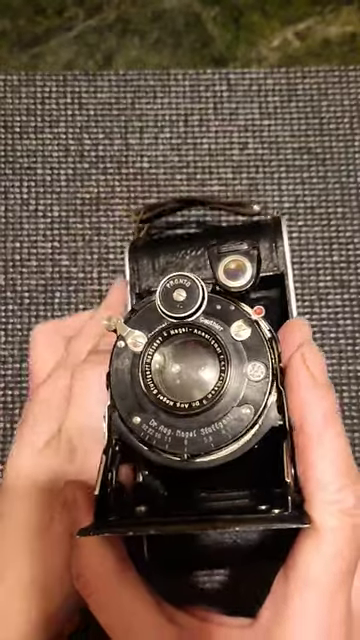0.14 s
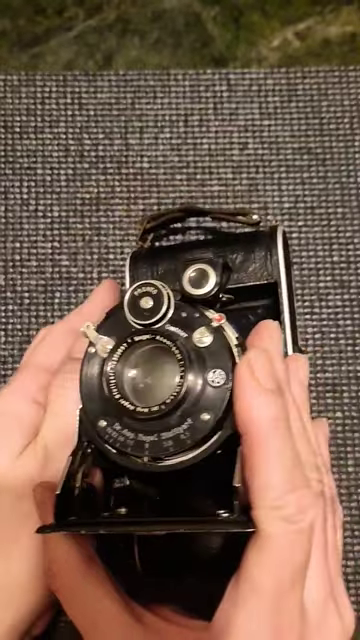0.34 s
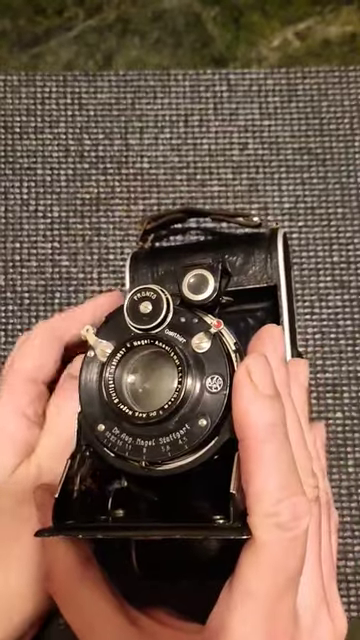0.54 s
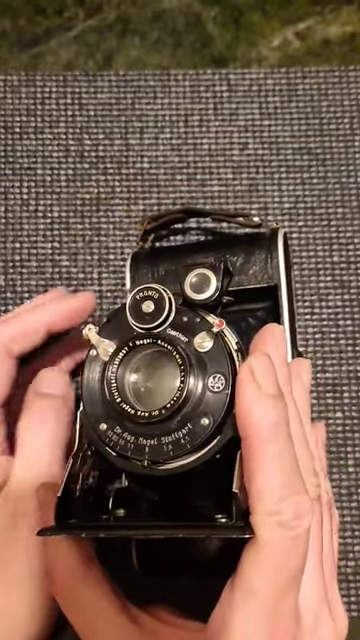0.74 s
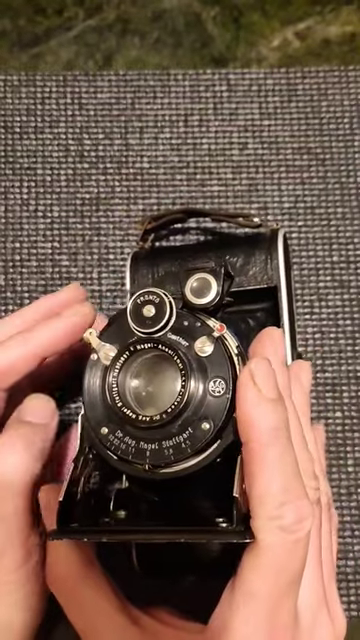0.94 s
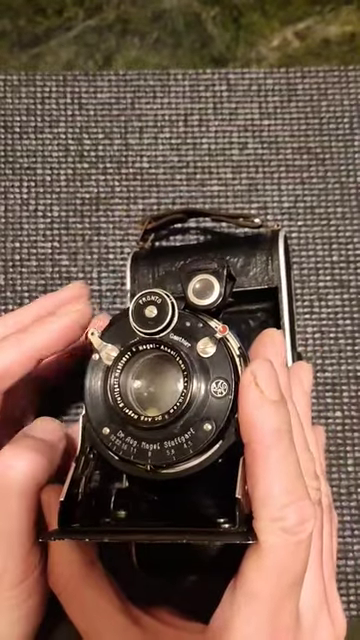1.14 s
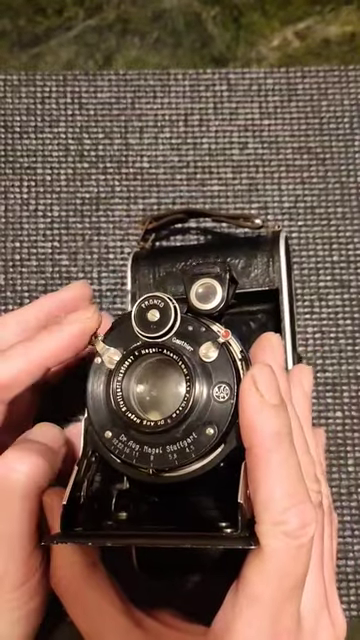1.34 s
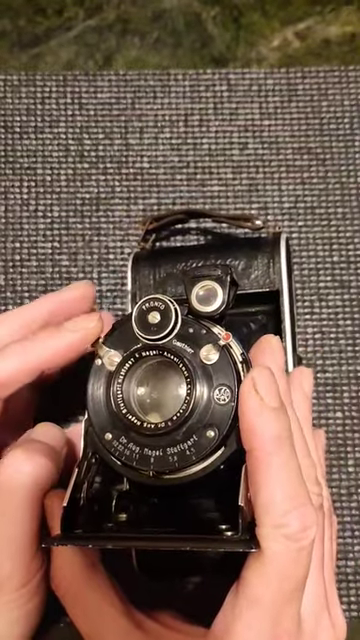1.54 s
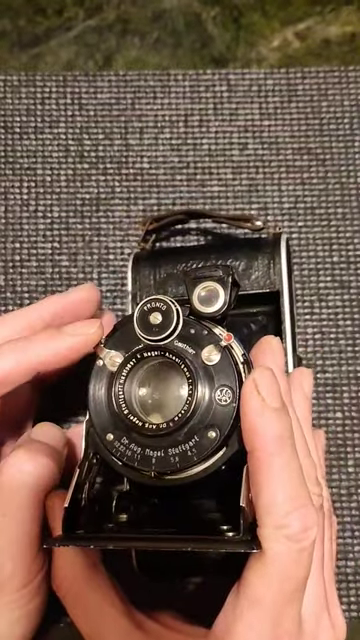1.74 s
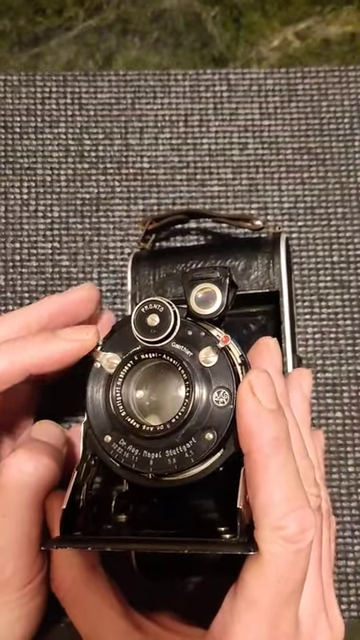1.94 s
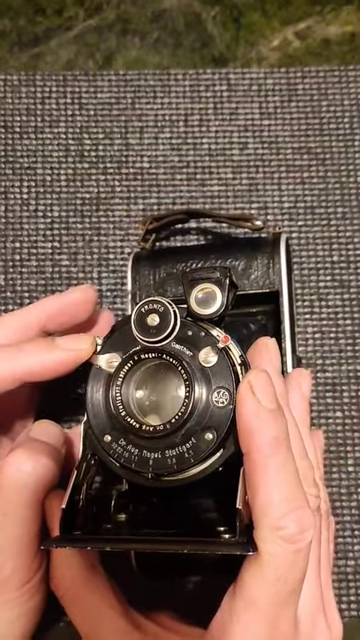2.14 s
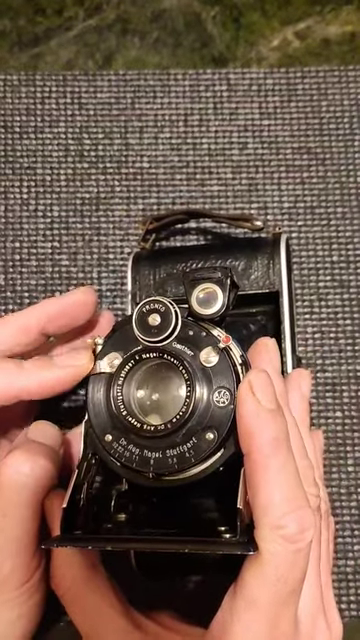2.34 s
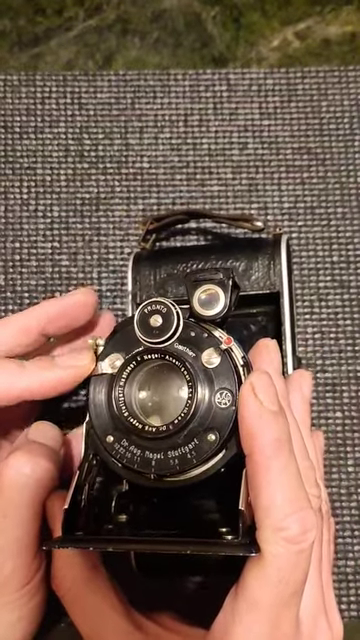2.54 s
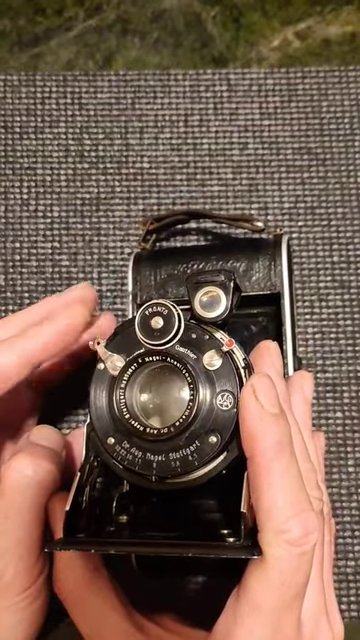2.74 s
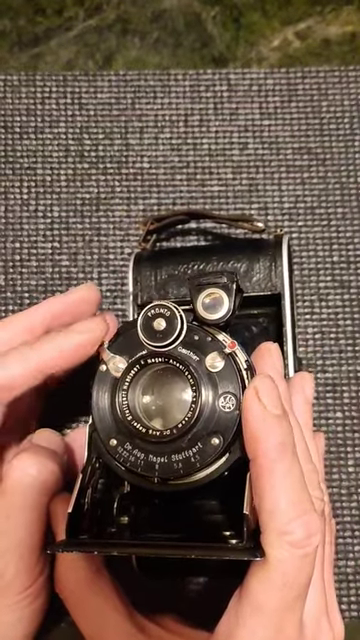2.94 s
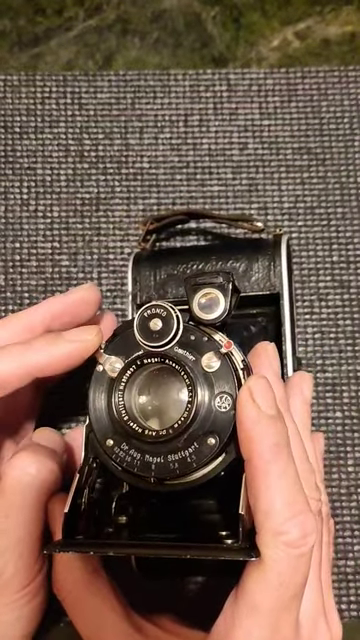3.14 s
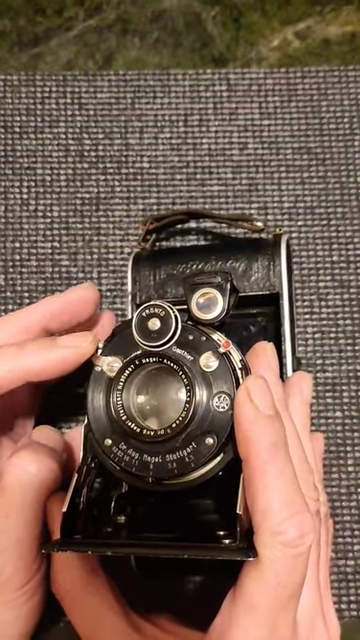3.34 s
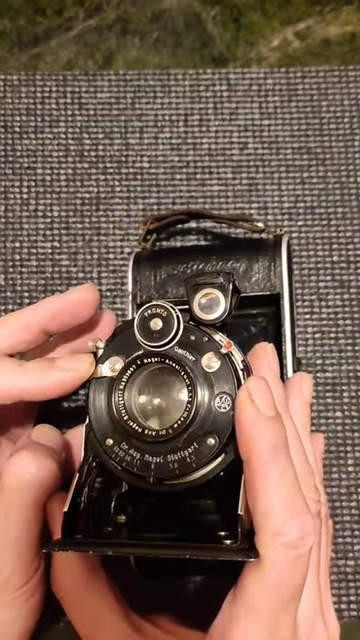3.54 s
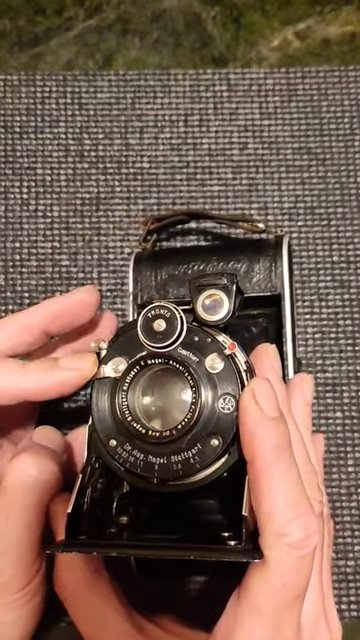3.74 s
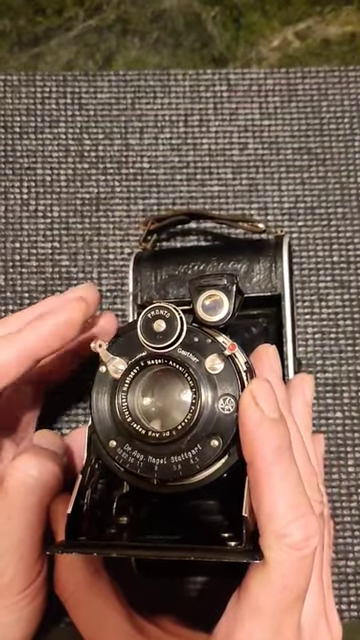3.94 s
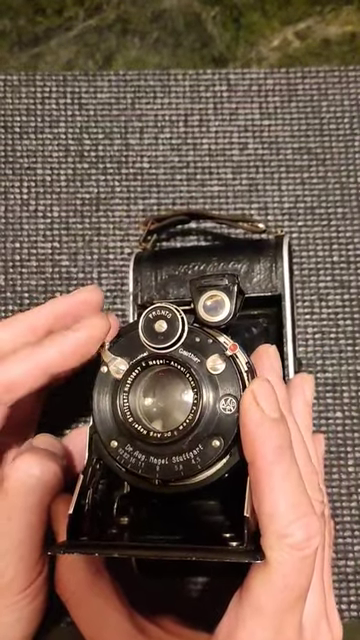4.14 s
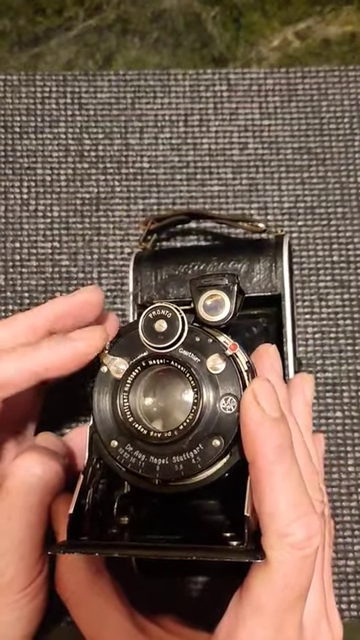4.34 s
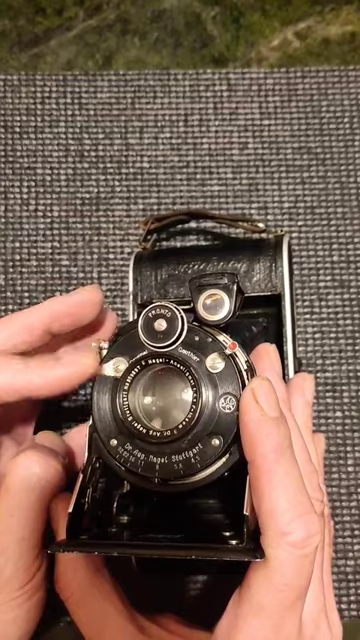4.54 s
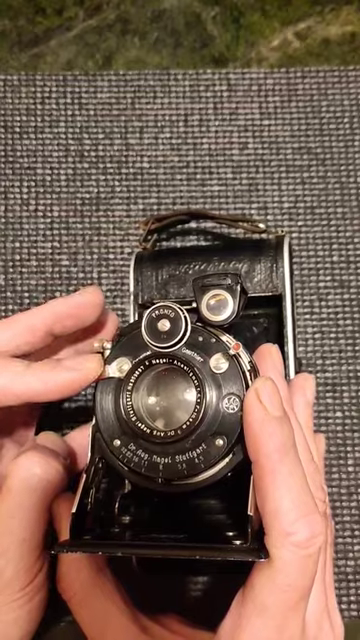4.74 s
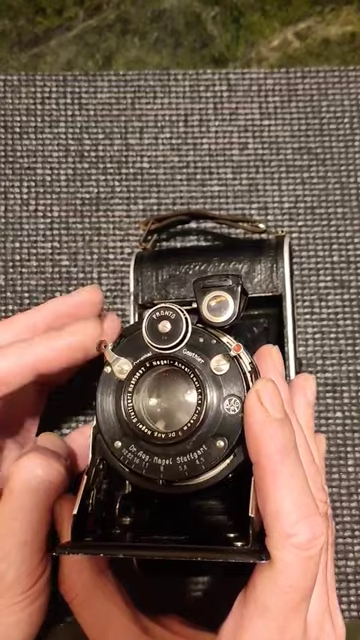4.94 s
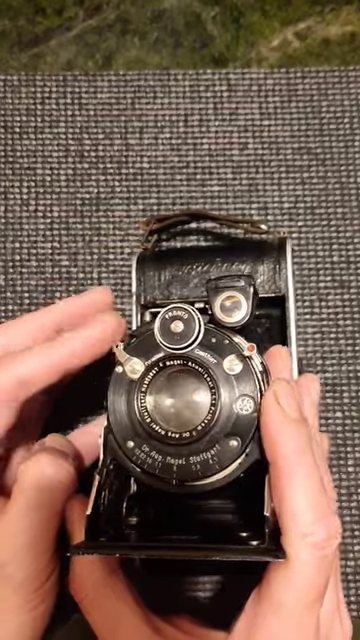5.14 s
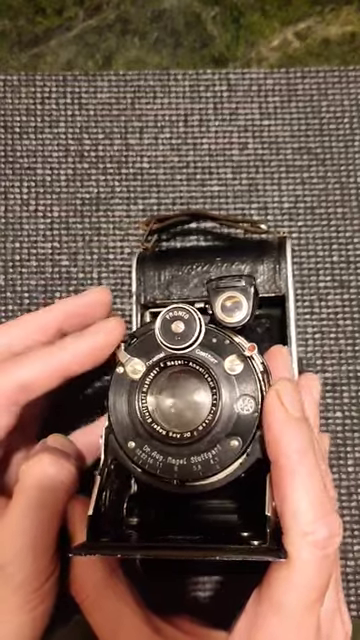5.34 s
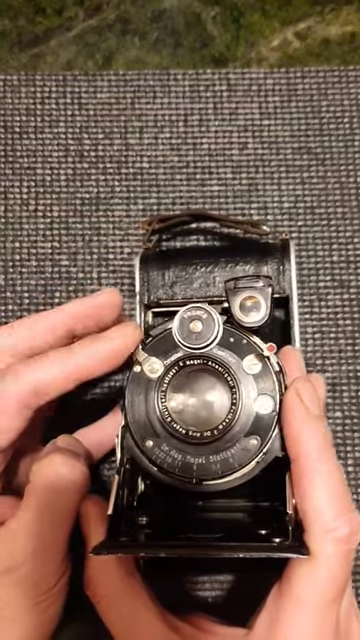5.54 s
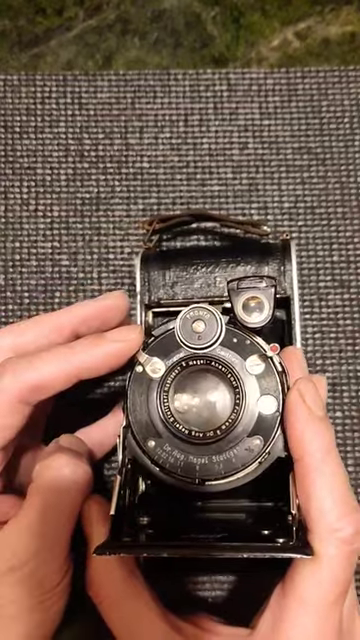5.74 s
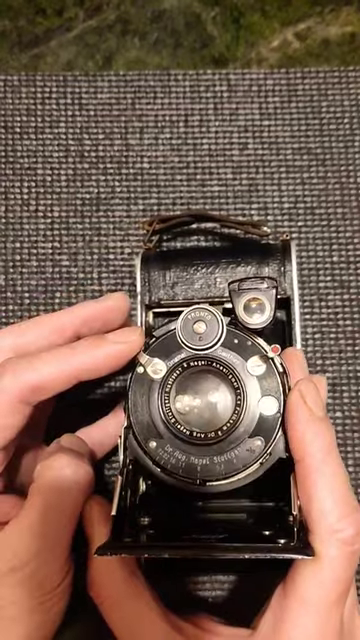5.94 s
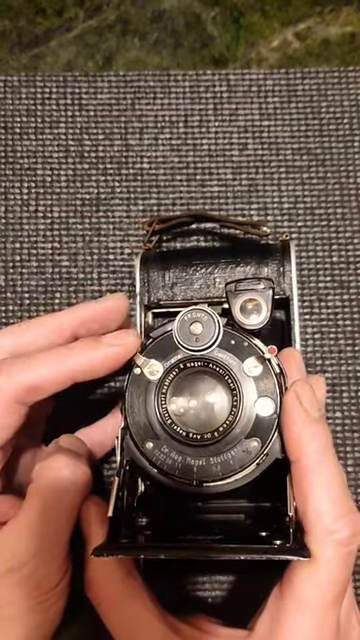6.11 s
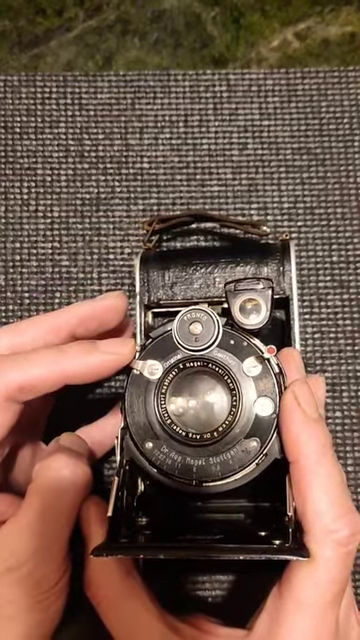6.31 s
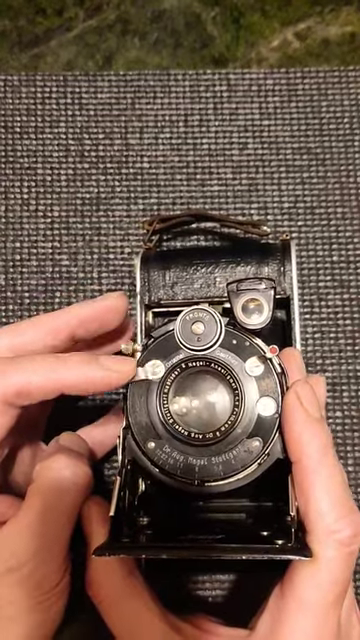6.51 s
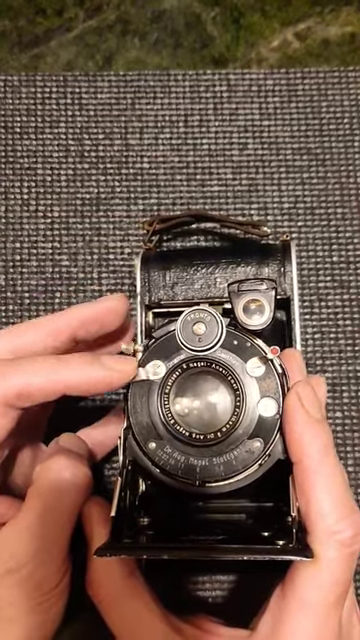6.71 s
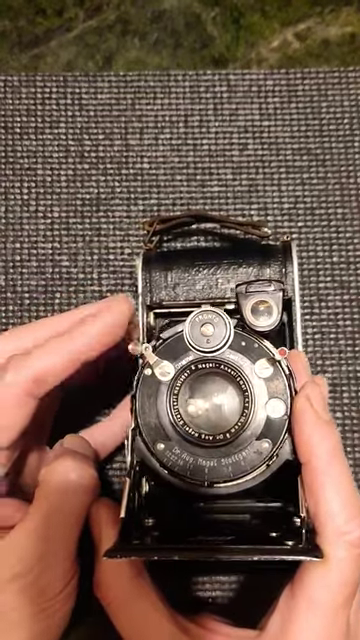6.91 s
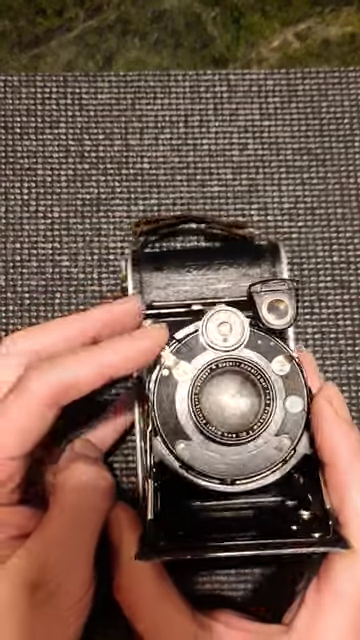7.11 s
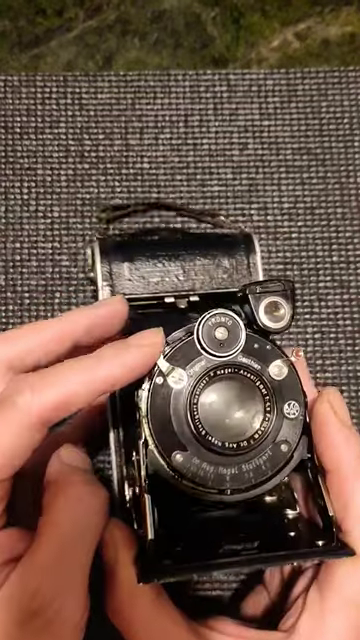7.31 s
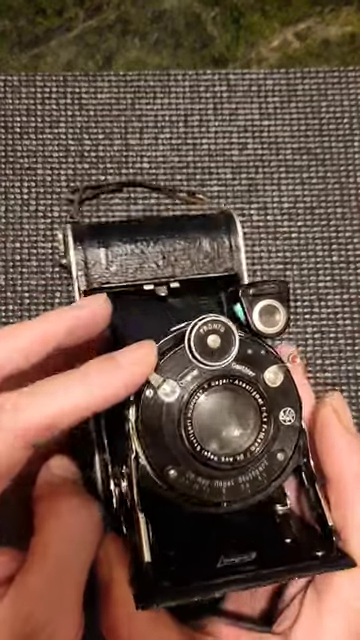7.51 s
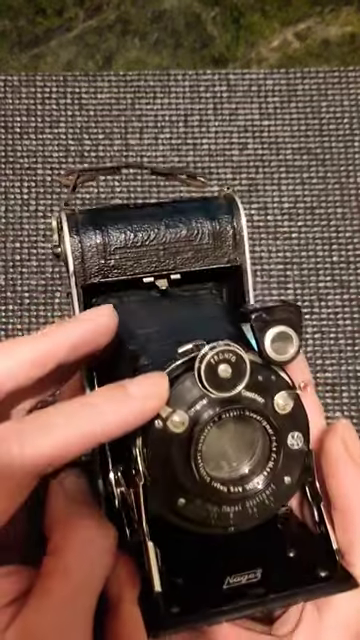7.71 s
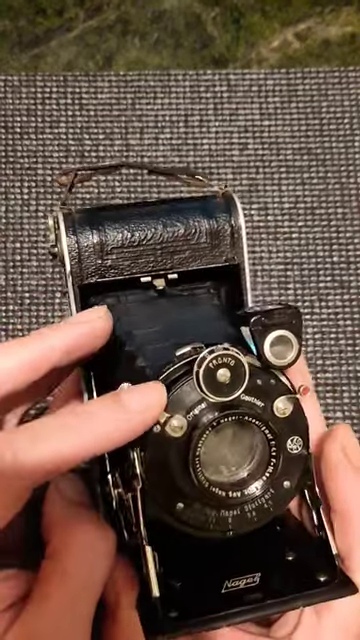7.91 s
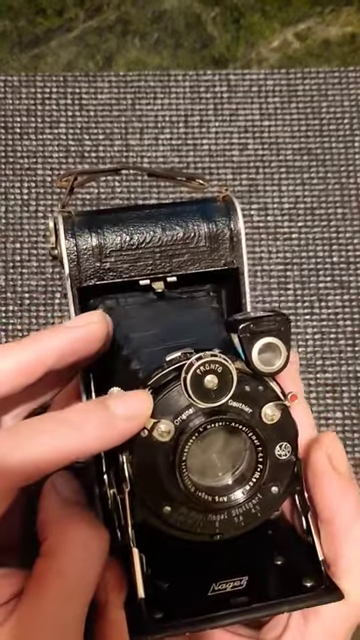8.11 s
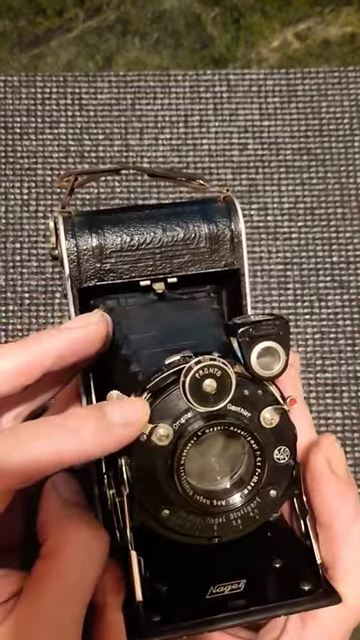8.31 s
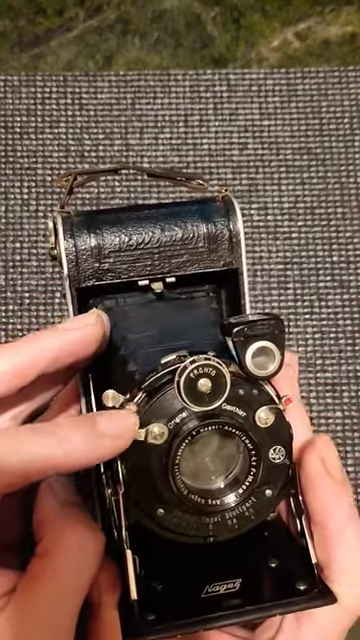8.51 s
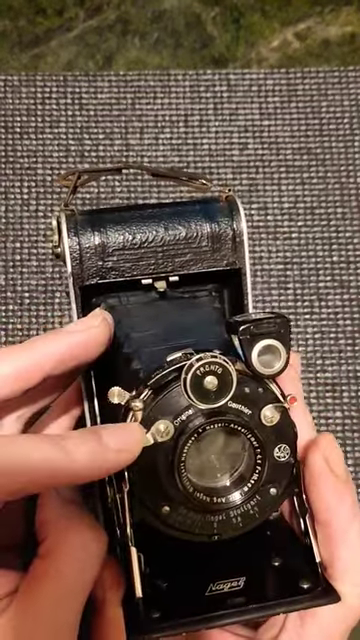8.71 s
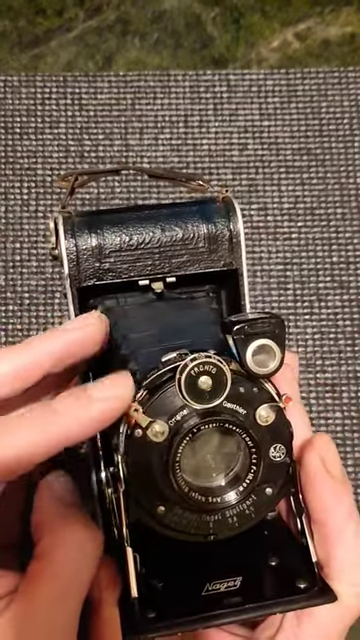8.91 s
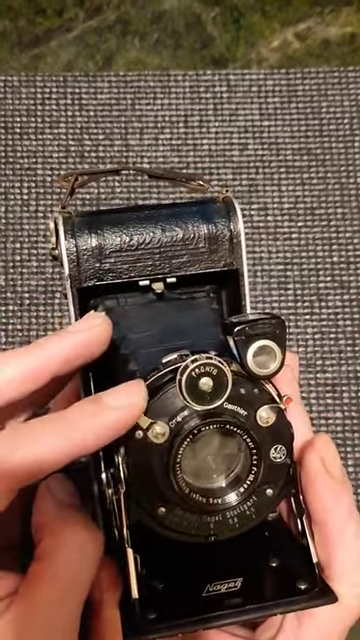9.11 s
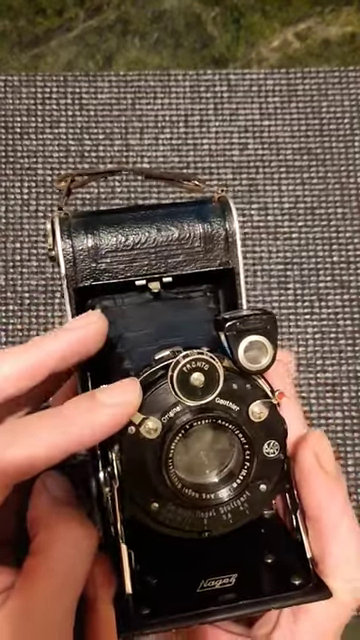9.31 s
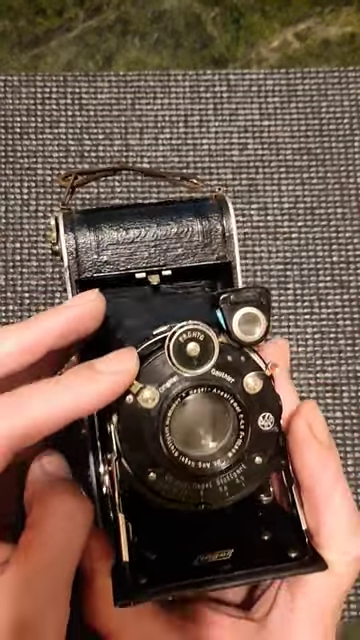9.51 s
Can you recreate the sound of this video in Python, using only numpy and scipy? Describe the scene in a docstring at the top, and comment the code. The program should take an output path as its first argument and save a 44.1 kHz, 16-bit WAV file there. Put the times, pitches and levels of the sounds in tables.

```python
"""Hands rustle and knock softly on the leather body of an old folding camera, close to a stereo microphone.
Five times a finger presses the lever: the shutter trips, slams and rebounds within 25 ms, and the lever clicks
back about 0.3 s later. Each blow is a rattle of tiny impacts that sets the camera's parts ringing in their
damped modes; the rustle is friction noise, and a finger rubbing on the lever makes faint narrow swishes. Behind
it lies a quiet room with soft puffs of noise, mains hum, the rumble of far traffic and a faint hiss."""
import sys
import numpy as np
from scipy import signal
from scipy.fft import rfft, irfft
from scipy.io import wavfile
from scipy.ndimage import uniform_filter1d

SR = 44100
rng = np.random.default_rng(int(sys.argv[2]) if len(sys.argv) > 2 else 0)


def master(y):
    """Save y as 16-bit WAV."""
    cut = np.clip(np.atleast_2d(y).T, -1, 1)
    pcm = np.round(cut * 32767)  # scale
    wavfile.write(sys.argv[1], SR, pcm.astype(np.int16))


N = 421596

# Each kind of stroke: drive of crack, housing, blades, lever, frame and body in dB, then rattle in ms.
TRIP = (0.75, -3, -0.7, -21.5, -7, -12.5, 6)
CATCH = (-4, -0.3, -13, -21, -6, -12, 6)
BLADES = (3.5, -3.5, -3, -24, -12.5, -16.5, 4.5)
SLAM = (-4.5, 3, -9.5, -25, -4.5, -18.5, 4.5)
REBOUND = (-5.5, 3, -12, -24, -14.5, -16.5, 3.5)
RETURN = (0.3, -3.5, -2, -5.5, -9.5, -12.5, 6)
TICK = (0, -2, -7.5, -13, -6.5, -29, 7)
# The shutter fires. Each row: start in seconds, gains of trip, blades and slam in dB,
# rebound delay in ms, rebound gain in dB.
FIRINGS = [(2.4771, -25, -18.5, -14.5, 22, -23.5), (3.684, -27, -17, -17, 22.7, -22.5),
           (4.7037, -27, -15.5, -15.5, 25, -24), (6.625, -24.5, -17.5, -16, 22.6, -18.5),
           (8.7125, -27.5, -13, -18.5, 21, -26)]
def shutter(catch_ms=2.2, blades_ms=11.6, slam_ms=14, settle_ms=10, catch_db=1, settle_db=-16):
    """A chain of collisions: trip, catch, blades, slam, rebound and a weaker settling bounce."""
    strokes = []
    for start, trip_db, blades_db, slam_db, rebound_ms, rebound_db in FIRINGS:
        chain = [(0, trip_db, TRIP), (catch_ms, trip_db + catch_db, CATCH),
                 (blades_ms, blades_db, BLADES), (slam_ms, slam_db, SLAM),
                 (rebound_ms, rebound_db, REBOUND),
                 (rebound_ms + settle_ms, rebound_db + settle_db, REBOUND)]
        strokes += [(start + ms / 1000, db, *kind) for ms, db, kind in chain]
    return strokes


# The lever's return clicks and faint ticks. Each row: start in seconds, gain in dB.
LEVER_RETURNS = [(2.7954, -30.5), (3.9644, -24), (5.0724, -25.5), (6.9536, -27), (8.9889, -25.5)]
LEVER_TICKS = [(2.344, -58.5), (2.727, -59), (2.746, -52), (2.781, -56), (3.235, -62), (3.6435, -55.5),
               (3.9384, -54), (4.669, -61.5), (5.046, -49), (6.588, -57.5), (6.915, -52.5), (8.522, -57),
               (8.676, -59), (8.954, -52)]
def lever():
    """Impact and backlash: the lever snaps back, and ticks as it takes up or loses its slack."""
    return [(*row, *RETURN) for row in LEVER_RETURNS] + [(*row, *TICK) for row in LEVER_TICKS]


# A soft finger's drive of crack, housing, blades and lever, in dB.
FINGER_DRIVE = (3.2, -5, -12, -31)
# Fingers bump the camera. Each row: start in seconds, gain in dB, drive of frame, body and thump in dB,
# rattle in ms, low-pass cutoff in Hz.
SCUFFS = [(0.3139, -32, -2.5, -2.5, -25, 5.1, 6000), (0.321, -48, -5, -15, -27, 50, 6000),
          (0.4027, -52.5, -7, 5.5, -5, 10, 1500), (1.0557, -39, -0.5, 3, 2, 6, 6950),
          (7.186, -40, -1.5, -24, -25, 22, 4000), (7.2677, -53.5, 16.5, 6, -9, 15.6, 4140),
          (7.3127, -62.5, -6.5, 12.5, -8, 6.3, 2000), (7.389, -52, 1.5, 8, 5, 9, 5000),
          (7.6178, -52, 0, 8.5, 4.5, 8.6, 5000), (7.7699, -47, -2, 3.5, -2, 7.2, 6000),
          (7.8021, -53.5, -4, -7, -20, 8.9, 6000)]
def scuffs():
    """Soft contact passes little treble, so a finger's blows are dull."""
    return [(start, db, *FINGER_DRIVE, *rest) for start, db, *rest in SCUFFS]


# Spectra of the unringing crack and the thin blades. Each row: frequency in Hz, relative level in dB.
CRACK_SPECTRUM = [(500, -60.5), (2000, -24), (4000, -8.5), (6000, 2), (8000, -3.5), (10000, -19.5),
                  (15000, -46.5)]
BLADE_SPECTRUM = [(5000, -83.5), (7500, 16.5), (10000, 26.5), (13500, 29.5), (14500, 25), (15100, -30),
                  (16300, -40.5)]
# Modes of the shutter housing, lever, folding frame, leather-covered body with bellows, and the whole
# camera thumping in the palm. Each row: frequency in Hz, bandwidth in Hz, relative level in dB.
HOUSING_MODES = [(4530, 50, -17), (4867, 280, 7), (5500, 240, -9), (6450, 560, -8.5), (7090, 420, -9),
                 (7790, 970, -17)]
LEVER_MODES = [(1004, 350, -3.5), (1970, 120, 1.5), (2780, 56, -9.5), (3170, 150, -4), (3420, 41, -2),
               (4810, 230, -4.5), (5620, 210, -8.5), (6370, 200, -6.5), (7350, 130, -9.5), (7856, 170, -6)]
FRAME_MODES = [(1870, 47, -1.5), (1973, 93, 1), (2710, 290, -7.5), (3034, 290, -3.5), (3330, 160, -6),
               (3740, 120, -12.5)]
BODY_MODES = [(414, 38, -4), (502, 120, -6.5), (860, 52, 1), (970, 150, 5), (1556, 590, 0.5)]
THUMP_MODES = [(259.9, 140, -3), (413, 100, 0.1), (620, 210, -3)]
def camera(strokes, bumps, alike=0.59, grain_db=5.5):
    """Impact excitation: each blow is a short rattle that drives all the camera's resonances at once."""
    t, out = np.arange(2000) / SR, np.zeros((2, N + 8192))
    responses = [minimum_phase(CRACK_SPECTRUM), ringing(HOUSING_MODES, alike=0.8),
                 minimum_phase(BLADE_SPECTRUM), ringing(LEVER_MODES, alike=0.62),
                 ringing(FRAME_MODES, alike=0.7), ringing(BODY_MODES), ringing(THUMP_MODES)]
    response_db = np.array([5, 9, 12, 12, 12, 12, 12])
    # metal strokes are bright, with almost no thump (-60 dB)
    metal = [(*row, -60, rattle_ms, BAND_LIMIT_HZ) for *row, rattle_ms in strokes]
    for start, db, *drive_db, rattle_ms, cutoff_hz in metal + bumps:
        common, left, right, size = rng.standard_normal((4, len(t)))
        age = t * 4000 / rattle_ms  # the envelope peaks a quarter of the way into the rattle
        strength = gain_of(grain_db * size) * age * np.exp(-age)
        # parts radiate differently towards each ear, so the two sides agree only in part
        impacts = strength * (alike * np.sign(common) + np.sqrt(1 - alike ** 2) * np.sign([left, right]))
        softness = signal.butter(2, cutoff_hz, fs=SR, output="sos")
        at = round(start * SR)
        for response, part_db in zip(responses, response_db + drive_db):
            part = signal.sosfilt(softness, strike(impacts, response))
            part *= np.sqrt(rattle_ms)  # a longer rattle carries more energy
            out[:, at:at + part.shape[1]] += gain_of(db + part_db) * part
    return out[:, :N]


def ringing(modes, alike=1.0, size=2048):
    """Damped modes: each is a dying sine, whose phase differs between the ears when alike is below 1."""
    t = np.arange(size) / SR
    hz, width, db = np.transpose(modes)[:, :, None]
    phase = (1 - alike) * rng.uniform(-np.pi, np.pi, hz.shape) * np.array([-.5, .5])[:, None, None]
    rings = gain_of(db) * width * np.exp(-np.pi * width * t) * np.sin(2 * np.pi * hz * t + phase)
    # little is radiated below the lowest mode
    return signal.sosfilt(signal.butter(4, 0.85 * hz.min(), "high", fs=SR, output="sos"), rings)


def minimum_phase(spectrum, size=2048):
    """Minimum phase gives a spectrum its most abrupt causal response, here of unit energy."""
    log_gain = np.log(gain_of(read(spectrum, abs(np.fft.fftfreq(size, 1 / SR)))))
    taps = np.fft.ifft(np.exp(np.conj(signal.hilbert(log_gain)))).real[:size // 2]
    return (taps / np.linalg.norm(taps))[None, None]


def strike(impacts, rings, spot_db=3.5):
    """Modal superposition at unit energy; each mode's share varies, as no two blows hit the same spot."""
    modes = signal.fftconvolve(impacts[:, None], rings, axes=2)
    modes *= np.linalg.norm(rings, axis=2, keepdims=True) / np.linalg.norm(modes, axis=2, keepdims=True)
    modes *= gain_of(spot_db * rng.standard_normal((modes.shape[1], 1)))
    total = modes.sum(1)
    return total / np.linalg.norm(total, axis=1, keepdims=True)


# How the camera faces the microphone. Each row: frequency in Hz, left minus right level in dB.
FACING = [(400, -1), (800, 2), (2400, -1), (4500, -4), (8000, 0), (13000, -4.5)]
def stereo_ports(sound, lag_s=.00004):
    """Level and time differences give direction: the left port is a little further from the camera."""
    hz = np.fft.rfftfreq(N, 1 / SR)
    left = gain_of(read(FACING, hz) / 2) * np.exp(-1j * np.pi * hz * lag_s)
    return irfft(rfft(sound) * [left, 1 / left], N)


# The room's decay. Each row: frequency in Hz, time to fall by 60 dB in seconds.
ROOM_DECAY = [(300, 0.43), (800, 0.25), (2000, 0.22), (5500, 0.31), (12000, 0.27)]
# The colour of its tail. Each row: frequency in Hz, relative level in dB.
ROOM_SPECTRUM = [(300, -22), (1000, -28), (3000, -26), (4900, -33.5), (6500, -30), (13500, -30),
                 (14800, -53.5)]
def room(sound, first_s=0.0041, spacing=20):
    """Reverberation: sparse reflections of random sign, each band dying at its own rate."""
    reflections = np.zeros((2, SR // 2))
    slots = np.arange(round(first_s * SR), SR // 2 - spacing, spacing)
    arrivals = slots + rng.integers(0, spacing, (2, len(slots)))
    np.put_along_axis(reflections, arrivals, rng.choice([-1., 1.], arrivals.shape), 1)
    hz, t, bands = signal.stft(reflections, SR, nperseg=128)
    fade = gain_of(-60 * t / read(ROOM_DECAY, hz)[:, None])
    fade *= gain_of(read(ROOM_SPECTRUM, hz)[:, None]) / np.linalg.norm(fade, axis=1, keepdims=True)
    tail = 6.75 * signal.istft(bands * fade, SR, nperseg=128)[1]
    return signal.fftconvolve(sound, tail, axes=1)[:, :N]


# Spectra of the two rustles and the shaking grip. Each row: frequency in Hz, relative level in dB.
DULL_RUSTLE = [(250, -1.5), (600, 6), (1500, 1), (3500, -4), (7000, -24), (14000, -80.5)]
BRIGHT_RUSTLE = [(800, -53), (2000, -19.5), (3500, -0.5), (6000, -4), (8000, -16.5), (13800, -13.5),
                 (14500, -74.5)]
GRIP_SHAKE = [(50, -30.5), (95, 10.5), (160, 2), (280, -2.5), (450, -27.5), (1500, -84.5)]
# The hands shift. Each row: time in seconds, dull rustle level in dB, bright rustle level in dB.
GRIP = [(0.0, -65.5, -66), (0.15, -66, -60.5), (0.35, -65, -64.5), (0.5, -66, -73.5), (0.85, -71, -76.5),
        (1.01, -70.5, -66), (1.2, -70, -76.5), (2.39, -68.5, -70), (2.93, -70, -80), (3.72, -70.5, -72.5),
        (3.89, -69, -66.5), (4.15, -68.5, -79), (5.27, -68.5, -77), (5.86, -71, -78.5),
        (6.55, -66.5, -73.5), (7.25, -65.5, -64.5), (7.61, -66, -78.5), (8.89, -65, -72),
        (9.56, -68.5, -83)]
def hands():
    """Friction of skin on leather makes broadband noise; the grip's low shaking follows the dull rustle."""
    times, *levels = np.transpose(GRIP)
    dull_db, bright_db = (np.interp(np.arange(N) / SR, times, db) for db in levels)
    shake_db = -61.5 + 1.1 * (dull_db + 67.5)
    dull = gain_of(dull_db) * noise(DULL_RUSTLE, patchy_db=2.0, flicker_db=2.7)
    bright = gain_of(bright_db) * noise(BRIGHT_RUSTLE, patchy_db=2.5, flicker_db=1.5)
    shake = gain_of(shake_db) * noise(GRIP_SHAKE, patchy_db=1.0, size=4096)
    return dull + bright + shake


# Faint narrow swishes, and soft broad puffs recurring on a two-second beat. Each row: start and length
# in seconds, centre frequency and bandwidth in Hz, level in dB.
SWISHES_AND_PUFFS = [(0, 0.19, 2760, 60, -64.5), (0.224, 0.084, 5900, 300, -72),
                     (0.77, 0.2, 6000, 1200, -67.5), (0.858, 0.15, 4380, 300, -66.5),
                     (0.93, 0.17, 5050, 400, -64.5), (1.136, 0.05, 2070, 500, -61.5),
                     (1.363, 0.087, 1200, 1580, -63), (1.45, 0.22, 2470, 700, -69.5),
                     (1.778, 0.15, 6100, 200, -72), (2.064, 0.14, 5800, 1500, -69),
                     (2.103, 0.32, 4700, 830, -67), (3.259, 0.28, 4880, 599, -69),
                     (3.329, 0.23, 1470, 2080, -66.5), (5.359, 0.14, 1780, 2560, -64),
                     (6.075, 0.22, 5010, 301, -75.5), (8.095, 0.13, 5080, 205, -73),
                     (9.33, 0.15, 2480, 4040, -63.5)]
def swishes_and_puffs():
    """Band-limited noise fades in and out: a narrow band is heard as a swish, a broad one as a puff."""
    out = np.zeros((2, N))
    for start, length, hz, width, db in SWISHES_AND_PUFFS:
        band = signal.butter(2, [hz - width / 2, hz + width / 2], "band", fs=SR, output="sos")
        at, count = round(start * SR), round(length * SR)
        burst = signal.sosfilt(band, rng.standard_normal((2, SR // 2)))[:, :count]
        out[:, at:at + count] += gain_of(db) * unit_rms(burst) * signal.windows.tukey(count, .6)
    return out


# Levels of the hum's first two harmonics, in dB.
HUM_LEVELS = [-60, -70.5]
def mains_hum(hz=119.9, waver_db=1.5):
    """An appliance vibrates in harmonics of twice the mains frequency; the level wavers in each ear."""
    t, out = np.arange(N) / SR, 0
    for harmonic, db in enumerate(HUM_LEVELS, 1):
        drift = uniform_filter1d(rng.standard_normal((2, N)), size=3000)
        waver = unit_rms(uniform_filter1d(drift, size=3000))
        tone = np.sqrt(2) * np.sin(2 * np.pi * (harmonic * hz * t + rng.random()))
        out += gain_of(db + waver_db * waver) * tone
    return out


# The rumble's spectrum. Each row: frequency in Hz, relative level in dB.
TRAFFIC_SPECTRUM = [(10, 18.5), (25, 19.5), (50, 12), (75, -19), (300, -91.5)]
# Its swells. Each row: time in seconds, level in dB.
TRAFFIC_LEVELS = [(0.0, -56.5), (2.29, -54), (2.5, -51.5), (3.17, -58.5), (5.99, -56), (6.34, -50),
                  (6.52, -54), (9.56, -54)]
def far_traffic():
    """Low frequencies carry furthest, so distant traffic arrives as a slowly swelling rumble."""
    level_db = np.interp(np.arange(N) / SR, *np.transpose(TRAFFIC_LEVELS))
    return gain_of(level_db) * noise(TRAFFIC_SPECTRUM, patchy_db=2.9, size=4096)


# The background's spectrum. Each row: frequency in Hz, relative level in dB.
FLOOR_SPECTRUM = [(20, -3.5), (80, -21), (150, -19.5), (300, -21.5), (600, -26), (1300, -36), (3000, -40),
                  (5500, -45), (8300, -50.5), (11000, -44), (14000, -39.5), (14500, -100)]
def noise_floor(level_db=-61):
    """The quiet room and the microphone's hiss add up to a continuous noise floor."""
    return gain_of(level_db) * noise(FLOOR_SPECTRUM, patchy_db=4.3, flicker_db=0.56)


# Likeness of left and right noise. Each row: frequency in Hz, correlation from 0 to 1.
EAR_CORRELATION = [(30, .6), (60, .7), (130, .8), (290, .5), (640, .2), (1400, 0)]
def noise(spectrum, patchy_db, flicker_db=0., size=1024):
    """Spectral shaping: stereo noise of rms 1, with drifting patches and a flicker common to all bands."""
    frames, hz = 4 * N // size + 5, np.fft.rfftfreq(size, 1 / SR)
    left_re, left_im, other_re, other_im, patches = rng.standard_normal((frames, len(hz), 5)).T
    flicker = unit_rms(uniform_filter1d(patches[0], size=3))
    patches = unit_rms(uniform_filter1d(uniform_filter1d(patches, size=12, axis=0), size=12, axis=1))
    alike = read(EAR_CORRELATION, hz)[:, None]
    left = left_re + 1j * left_im
    right = alike * left + np.sqrt(1 - alike ** 2) * (other_re + 1j * other_im)
    shape = gain_of(read(spectrum, hz)[:, None] + patchy_db * patches + flicker_db * flicker)
    sound = signal.istft(shape * [left, right], nperseg=size, noverlap=3 * size // 4)[1]
    return unit_rms(sound[:, :N])


def gain_of(db):
    """Decibels to amplitude."""
    return 10 ** (np.asarray(db) / 20)


def unit_rms(x):
    """Scales to rms 1."""
    return x / np.sqrt(np.mean(x ** 2) + 1e-20)


def read(points, hz):
    """Interpolates a table on a log-frequency axis."""
    table_hz, values = np.transpose(points)
    return np.interp(np.log(hz + 1), np.log(table_hz + 1), values)


def scene():
    """Superposition: the camera and its reverberation over hands, swishes, hum, traffic and noise floor."""
    direct = stereo_ports(camera(lever() + shutter(), scuffs()))
    background = noise_floor() + far_traffic()
    return direct + room(direct) + hands() + swishes_and_puffs() + mains_hum() + background


TOP_HZ, TOP_DB, BAND_LIMIT_HZ = 14400, -8, 16500
def record(dry):
    """The microphone's frequency response: a shelf weakens the top, then a low-pass ends the band."""
    high_pass = signal.firwin(101, TOP_HZ, pass_zero=False, fs=SR)
    low_pass = signal.firwin(511, BAND_LIMIT_HZ, window=("kaiser", 9), fs=SR)
    top = signal.oaconvolve(dry, high_pass[None], "same")
    shelved = dry - (1 - gain_of(TOP_DB)) * top
    return signal.oaconvolve(shelved, low_pass[None], "same")


dry = scene()
out = record(dry)
master(out)
```